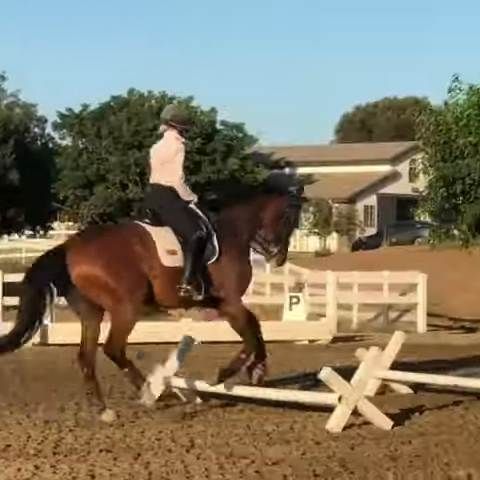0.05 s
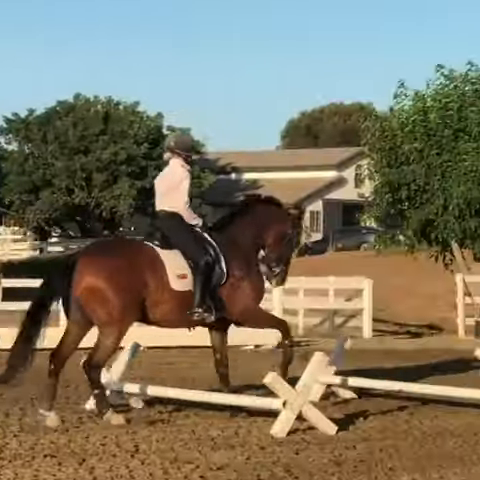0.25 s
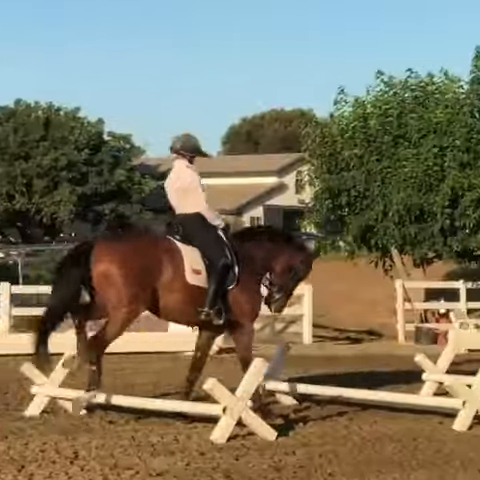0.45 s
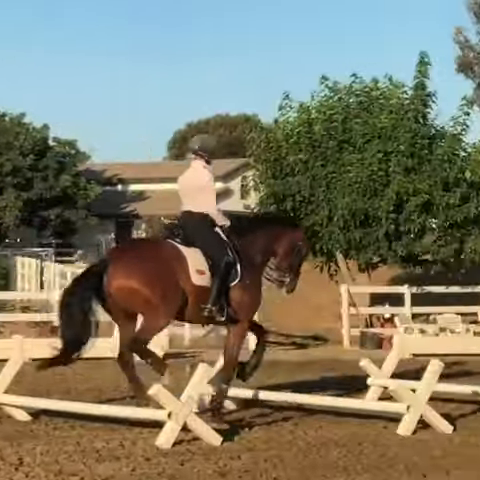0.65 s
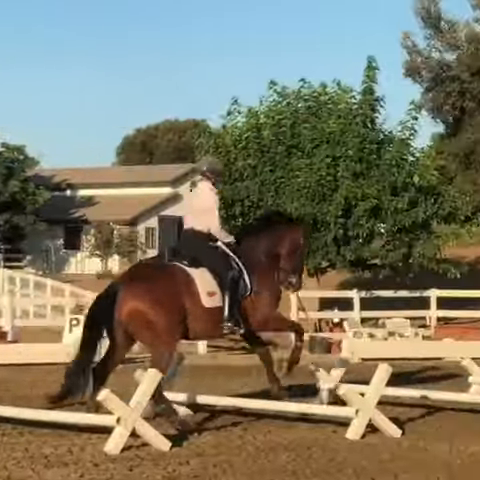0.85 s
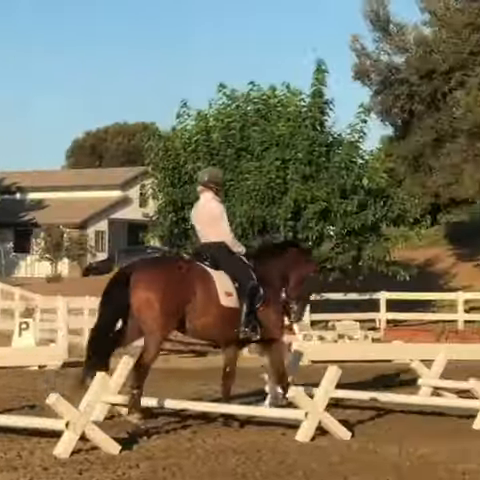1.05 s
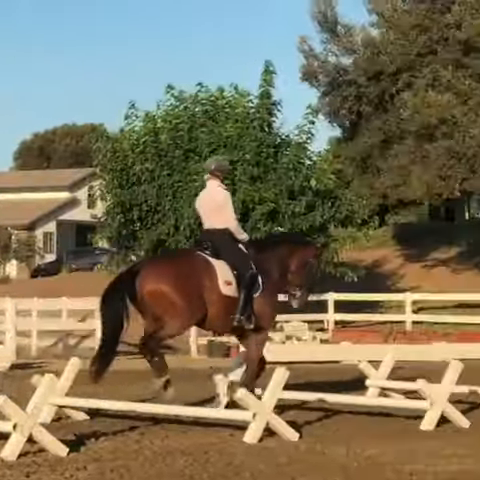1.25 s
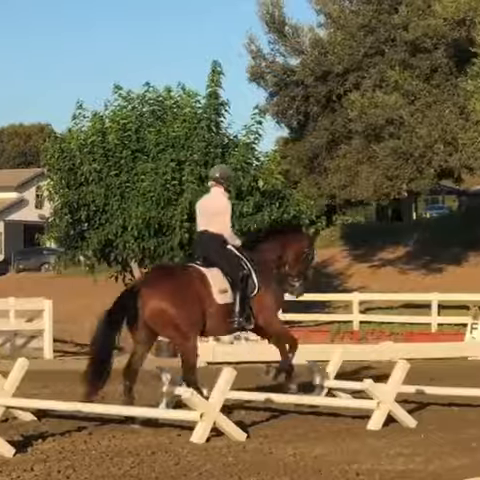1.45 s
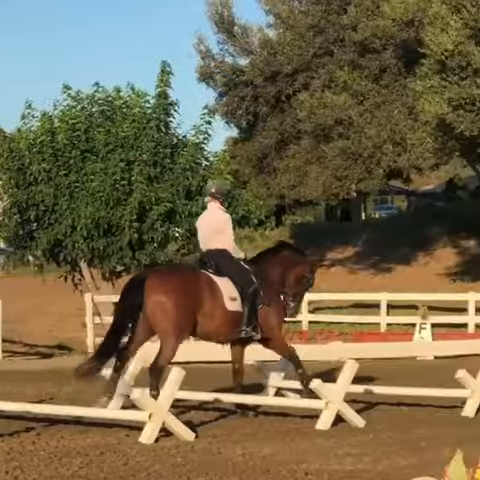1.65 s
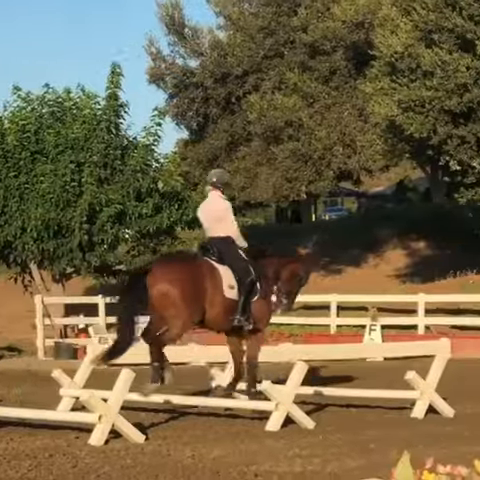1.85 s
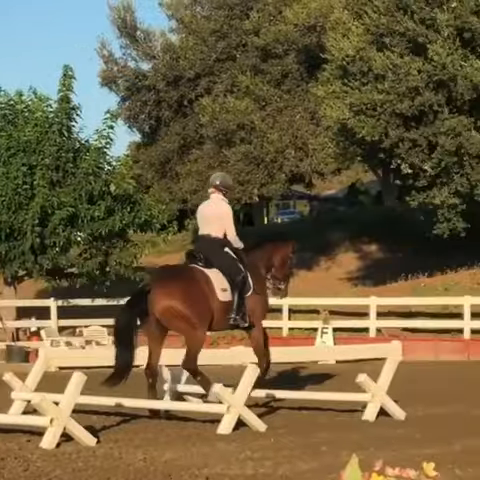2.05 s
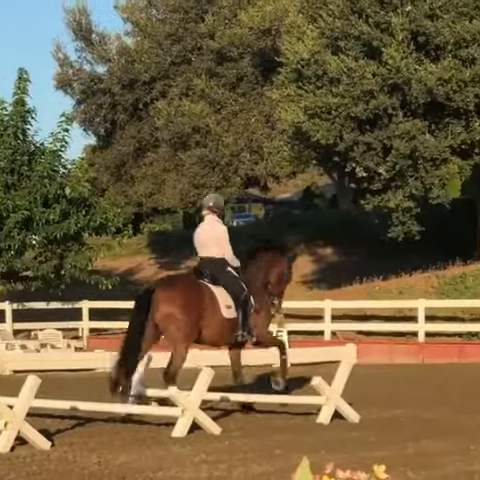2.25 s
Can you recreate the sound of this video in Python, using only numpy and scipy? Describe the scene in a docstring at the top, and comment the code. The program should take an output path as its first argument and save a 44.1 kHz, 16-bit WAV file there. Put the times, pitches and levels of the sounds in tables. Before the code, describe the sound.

One sharp knock of a hoof on a wooden pole, then soft thuds and clops as the horse canters across an open dirt arena. A dull double thump comes near the microphone, while faint wind and a distant engine hum continue.

```python
"""An open dirt arena: a horse canters over wooden poles. One hoof knocks a pole hard and sets it
ringing; the other hoofbeats are soft thuds and clops with sprays of sand. Tack jingles once and
the horse blows once a stride. Late on comes a dull double thump close by. A distant engine hums
under faint wind and hiss, and the horse echoes faintly from the surroundings."""
import sys
import numpy as np
from scipy import signal
from scipy.fft import rfft, irfft
from scipy.io import wavfile

SR = 44100
rng = np.random.default_rng(int(sys.argv[2]) if len(sys.argv) > 2 else 0)


def transcribe(u):
    """Save the signal u as a 16-bit wav file named by the first command-line argument.

    u: samples, shape (n,) or (channels, n), limited to [-1, 1]; the rate is SR.
    q: integer samples, one column per channel.
    """
    v = np.clip(np.atleast_2d(u).T, -1, 1)
    q = np.round(v * 32767).astype(np.int16)
    wavfile.write(sys.argv[1], SR, q)


N = 101429


def amp(db):
    """Decibels to gain."""
    return 10 ** (np.asarray(db) / 20)


def unit(x):
    """Scales to rms 1."""
    return x / np.sqrt(np.mean(x ** 2) + 1e-20)


def at_hz(points, hz):
    """Interpolates a table on a log-frequency axis."""
    f, value = np.transpose(points)
    return np.interp(np.log(hz + 0.0011), np.log(f), value)


def add(mix, start_s, sound):
    """Mixes a sound in at start_s."""
    at = round(start_s * SR)
    sound = sound[max(-at, 0):]
    part = mix[max(at, 0):][:len(sound)]
    part += sound[:len(part)]


def colour(x, spectrum, scale=1):
    """Filters x by a spectrum, frequencies times scale; rms 1."""
    hz = np.fft.rfftfreq(len(x), 1 / SR)
    return unit(irfft(rfft(x) * amp(at_hz(spectrum, hz / scale)), len(x)))


def noise(spectrum, size, scale=1):
    """Random-phase noise of a given spectrum; rms 1."""
    white = irfft(np.exp(2j * np.pi * rng.random(size // 2 + 1)), size)
    return colour(white, spectrum, scale)


def grains(spectrum, size, grain_db):
    """Noise roughened by a random gain on each sample; rms 1."""
    rough = rng.standard_normal(size) * amp(grain_db * np.minimum(rng.exponential(1, size), 5))
    return colour(rough, spectrum)


def puffs(rows, spectrum, grain_db, skew):
    """Swells of grainy noise; skew under 1 peaks early."""
    t, out = np.arange(16384) / SR, np.zeros(N)
    for start_s, length_s, db in rows:
        swell = np.sin(np.pi * np.minimum(t / length_s, 1) ** skew)
        add(out, start_s, amp(db) * grains(spectrum, len(t), grain_db) * swell)
    return out


def rise(t, rise_s):
    """Linear ramp, held at 1."""
    return np.minimum(t / rise_s, 1)


def decay(t, t60_s):
    """Falls 60 dB in t60_s."""
    return np.exp(-np.log(1000) * t / t60_s)


def drift(rate_hz):
    """Random wander up to about rate_hz; rms 1."""
    hz = np.fft.rfftfreq(N, 1 / SR)
    return unit(irfft(rfft(rng.standard_normal(N)) / (1 + (hz / rate_hz) ** 4), N))


# blow and rebound on the pole (time [s], level [dB])
KNOCKS = [(0.2381, -18), (0.25, -30.5)]
# pole modes (frequency [Hz], level [dB], t60 [s])
POLE_MODES = [(187.4, -3, 0.11), (234.5, -8, 0.12), (295.4, -15.5, 0.25), (377.4, -14, 0.26),
              (598, -6.5, 0.12), (675, -5, 0.067), (798, -4.5, 0.053), (868, -17, 0.093),
              (996, -19.5, 0.13), (1153, -2.5, 0.052), (1345, -4.5, 0.042), (1500, 2.5, 0.032),
              (2286, -9, 0.042), (3274, -5.5, 0.045)]
# contact noise (frequency [Hz], level [dB])
CRACK_SPECTRUM = [(100, -27), (250, -8.5), (700, 7), (950, -3), (1500, -2), (2000, -9.5), (2700, -13),
                  (3400, -5), (5000, -18), (9000, -17.5), (11500, -27), (15000, -77)]
# dry splintering (frequency [Hz], t60 [s])
SPLINTER_T60 = [(1500, 0.15), (10000, 0.14)]


def pole(ring_db=-7, crack_db=-8, splinter_db=-18, crack_t60_s=0.024, attack_s=0.00045):
    """Each hoof contact cracks and rings the pole's modes; low modes build more slowly."""
    t, out = np.arange(16384) / SR, np.zeros(N)
    ring = np.zeros(len(t))
    for hz, db, t60_s in POLE_MODES:
        envelope = rise(t, max(1.2 / hz, 0.0012)) * decay(t, t60_s)
        ring += amp(db) * envelope * np.sin(2 * np.pi * (hz * t + rng.random()))
    hardest_db = max(db for _, db in KNOCKS)
    for start_s, db in KNOCKS:
        wood = noise(CRACK_SPECTRUM, len(t))
        band_hz, age_s, bands = signal.stft(wood, SR, nperseg=256)
        bands = bands * decay(age_s, at_hz(SPLINTER_T60, band_hz)[:, None])
        splinter = signal.istft(bands, SR, nperseg=256)[1][:len(t)]
        crack = amp(crack_db) * wood * decay(t, crack_t60_s) + amp(splinter_db) * splinter
        glancing = amp(db - hardest_db) ** 0.5  # light touches ring less
        add(out, start_s, amp(db) * (amp(ring_db) * glancing * ring + crack * rise(t, attack_s)))
    return out


# hoofbeats (time [s], clop level [dB], clop pitch [Hz], thud level [dB])
HOOFBEATS = [(0.408, -59, 1150, -41.5), (.433, -59.5, 1160, -63), (0.5599, -46.5, 1236, -46),
             (0.869, -71.5, 1310, -45.5), (1.092, -59, 1305, -41.5), (1.2407, -43.5, 1380, -57),
             (1.7384, -47, 1438, -47.5), (1.892, -69.5, 1406, -69)]
# grit in a clop (frequency [x pitch], level [dB])
GRIT_SPECTRUM = [(.3, -0.5), (.7, -0.5), (1, 4), (1.25, 3.5), (1.5, -22), (1.75, -6.5), (3, -18.5),
                 (10, -35)]
# dirt in a thud (frequency [Hz], level [dB])
DIRT_SPECTRUM = [(50, -20), (170, 6.5), (350, -6), (600, -22), (12000, -89)]


def hooves(thud_hz=192.4, thud_lead_s=0.00285, dirt_db=-6, soften_db=14):
    """Each hoof thuds into the dirt, then clops as it lands flat; weak clops are slower, grittier."""
    t, out = np.arange(8192) / SR, np.zeros(N)
    hardest_db = max(row[1] for row in HOOFBEATS)
    for start_s, clop_db, clop_hz, thud_db in HOOFBEATS:
        weaker_db = hardest_db - clop_db
        grit = amp(-5 + 0.5276 * weaker_db) * noise(GRIT_SPECTRUM, len(t), scale=clop_hz)
        clop = np.sqrt(2) * np.sin(2 * np.pi * clop_hz * t) + grit
        age = t / 2 ** (weaker_db / soften_db)
        clop *= rise(age, 0.0011) * decay(np.maximum(age - 0.0034, 0), 0.015)  # rise, hold, fall
        thud = np.sin(2 * np.pi * thud_hz * t) + amp(dirt_db) * noise(DIRT_SPECTRUM, len(t))
        thud *= rise(t, rise_s=0.0039) * decay(t, t60_s=0.072)
        add(out, start_s, amp(clop_db) * clop)
        add(out, start_s - thud_lead_s, amp(thud_db) * thud)
    return out


# near thumps (time [s], peak level [dB], dulling [dB/kHz])
THUMPS = [(1.162, -48, 23.5), (1.6763, -21.5, 1.5), (1.714, -37, 13), (1.777, -50, 21)]
# thump before dulling (frequency [Hz], level [dB])
THUMP_SPECTRUM = [(25, -31), (45, -5), (70, -1), (140, 2.5), (220, -2.5), (350, -7.5), (600, -0.5),
                  (760, -2.5), (950, -22.5), (1300, -19), (1600, -31.5), (2000, -25), (2700, -50),
                  (6000, -84)]


def thumps(lag_cycles=2.6, knee_hz=27.7, lead_samples=256):
    """Single pushes, treble ahead of bass: each falls quickly from a tick to a thud."""
    hz, out = np.fft.rfftfreq(8192, 1 / SR), np.zeros(N)
    phase = -2 * np.pi * lag_cycles * np.log(1 + hz / knee_hz)
    for start_s, peak_db, db_per_khz in THUMPS:
        magnitude = amp(at_hz(THUMP_SPECTRUM, hz) - db_per_khz * hz / 1000)
        push = np.roll(irfft(magnitude * np.exp(1j * phase)), lead_samples)
        add(out, start_s - lead_samples / SR, amp(peak_db) * push / abs(push).max())
    return out


# breaths (time [s], length [s], level [dB])
BLOWS = [(-.01, 0.1, -58), (.645, 0.13, -57.5), (1.255, 0.15, -63.5), (1.97, 0.15, -63.5)]
# nostril noise (frequency [Hz], level [dB])
BREATH_SPECTRUM = [(250, -4), (700, -1.5), (1100, 6), (1450, 1.5), (1900, -14.5), (3200, -12), (5000, -20),
                   (9000, -31)]


def breath():
    """The horse blows through its nostrils once a stride."""
    return puffs(BLOWS, BREATH_SPECTRUM, grain_db=4, skew=0.52)


# thrown sand (time [s], length [s], level [dB])
SPRAYS = [(.18, 0.056, -68), (.289, 0.015, -53.5), (.32, 0.12, -63), (.85, 0.056, -64.5),
          (1.26, 0.14, -71.5), (1.97, 0.099, -74)]
# thrown sand (frequency [Hz], level [dB])
SPRAY_SPECTRUM = [(500, -2), (1500, 0), (3000, 2), (5500, 0.5), (9500, -5.5), (13500, -30)]
# hoof sweep (time [s], length [s], level [dB])
SWEEP = (1.54, 0.16, -64.5)
# swept sand (frequency [Hz], level [dB])
SWEEP_SPECTRUM = [(1000, 4), (4000, -15), (4370, 16), (4750, -1), (6500, 2), (8000, -3), (15000, -28)]


def sand():
    """Hooves throw sprays of sand; one sweeps through it."""
    sprays = puffs(SPRAYS, SPRAY_SPECTRUM, grain_db=7, skew=0.73)
    return sprays + puffs([SWEEP], SWEEP_SPECTRUM, grain_db=3.5, skew=1)


# jingle (frequency [Hz], level [dB])
TACK_SPECTRUM = [(5000, -9.5), (10000, 0), (15000, -19)]


def tack(start_s=0.123, length_s=0.035, level_db=-65):
    """One thin jingle of tack: a puff of bright noise."""
    return puffs([(start_s, length_s, level_db)], TACK_SPECTRUM, grain_db=4, skew=0.45)


# echo colour (frequency [Hz], level [dB])
ECHO_SPECTRUM = [(150, 1), (700, -17), (1300, -13.5), (2600, -7.5), (3300, -12), (4500, -0.5),
                 (12000, -1.5)]
# echo decay (frequency [Hz], t60 [s])
ECHO_T60 = [(200, 0.95), (1300, 1), (4000, 0.77), (10000, 0.49)]


def echoes(x, gain_db=-16.5, build_s=0.085, blur_hz=71.7):
    """Scattered echoes from fences, trees and houses, blurred in pitch."""
    hz, t, bands = signal.stft(rng.standard_normal(SR), SR, nperseg=256)
    envelope = rise(t, build_s) * decay(t, at_hz(ECHO_T60, hz)[:, None])
    bands = bands * envelope * amp(at_hz(ECHO_SPECTRUM, hz))[:, None]
    tail = signal.istft(bands, SR, nperseg=256)[1]
    wet = signal.fftconvolve(x, tail / np.linalg.norm(tail))[:N]
    blur = np.exp(2j * np.pi * np.cumsum(blur_hz * drift(blur_hz)) / SR)
    return amp(gain_db) * (signal.hilbert(wet) * blur).real


# engine orders (frequency [Hz], level [dB])
ENGINE_ORDERS = [(65.8, -56), (98.7, -51.5), (148, -67.5), (197, -71)]
# hum gain, with a brief dip (time [s], gain [dB])
ENGINE_GAIN = [(0, -4), (.4, -1), (.75, -3), (1.68, -1), (1.78, -29), (1.86, -9), (1.97, -2), (2.3, -3)]


def engine(waver_db=1.0, wander_hz=0.97):
    """Low orders of a distant engine, wavering in level and pitch."""
    t, hum = np.arange(N) / SR, np.zeros(N)
    for hz, db in ENGINE_ORDERS:
        gain = np.sqrt(2) * amp(db + waver_db * drift(6.6))
        cycles = np.cumsum(hz + wander_hz * drift(7.2)) / SR + rng.random()
        hum += gain * np.sin(2 * np.pi * cycles)
    return hum * amp(np.interp(t, *np.transpose(ENGINE_GAIN)))


# wind and hiss (frequency [Hz], level [dB])
AIR_SPECTRUM = [(20, -14.5), (70, 8.5), (130, 3), (250, -6), (450, -7.5), (750, -19.5), (1250, -17),
                (2100, -24), (4000, -28), (7000, -30), (9000, -33.5), (13500, -35.5), (15000, -80)]


def air(hiss_db=-58, gust_db=3.0, wind_top_hz=500, rustle_db=-74):
    """Steady hiss, faint wind swelling in the bass, and an uneven rustle of dirt."""
    hiss = noise(AIR_SPECTRUM, N)
    wind = signal.sosfiltfilt(signal.butter(2, wind_top_hz, fs=SR, output="sos"), hiss)
    rustle = grains(BREATH_SPECTRUM, N, grain_db=4.9)
    gusts = wind * (amp(gust_db * drift(18)) - 1)
    return amp(hiss_db) * (hiss + gusts) + amp(rustle_db + 6 * drift(5.4)) * rustle


def buzz(centre_hz=8640, width_hz=1030, level_db=-80, rates_hz=(60, 90, 150, 240)):
    """A narrow band of treble hiss flutters quickly, now more and now less."""
    t, hz = np.arange(N) / SR, np.fft.rfftfreq(N, 1 / SR)
    depth = 0.65 * amp(-drift(4.2))
    flutter = sum(np.cos(2 * np.pi * (rate * t + rng.random())) for rate in rates_hz)
    band = np.exp(-((hz - centre_hz) / width_hz) ** 2)
    hiss = irfft(rfft(rng.standard_normal(N)) * band, N)
    return amp(level_db) * unit((1 + depth * flutter) * hiss)


def scene():
    """The horse with its echoes, the sand, the near thumps and the background; mono."""
    horse = pole() + hooves() + breath() + tack()
    return (horse + sand() + echoes(horse) + thumps() + engine() + air() + buzz())[None]


def record(dry):
    """Low-pass at 14.7 kHz."""
    lowpass = signal.firwin(255, 14700, window=("kaiser", 8), fs=SR)
    return signal.oaconvolve(dry, lowpass[None], "same")


dry = scene()
out = record(dry)
transcribe(out)
```